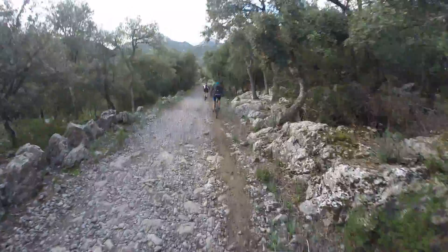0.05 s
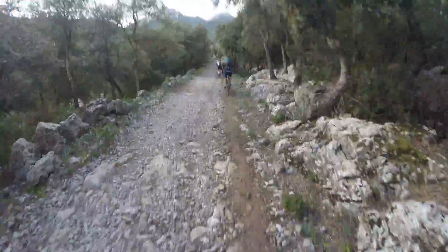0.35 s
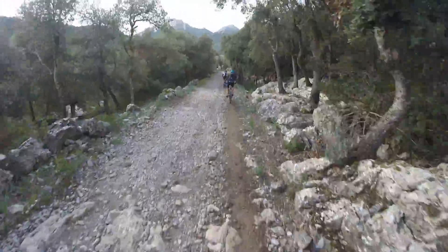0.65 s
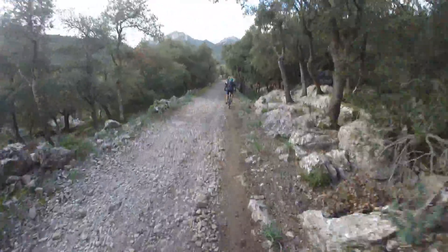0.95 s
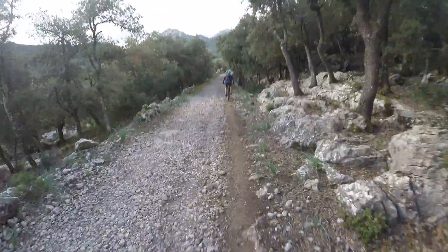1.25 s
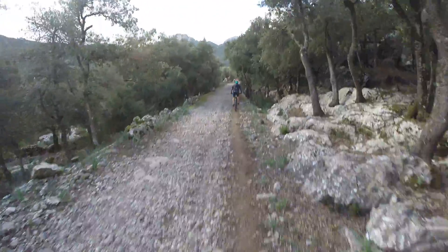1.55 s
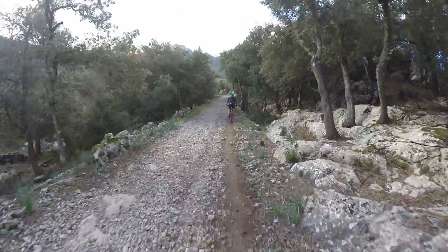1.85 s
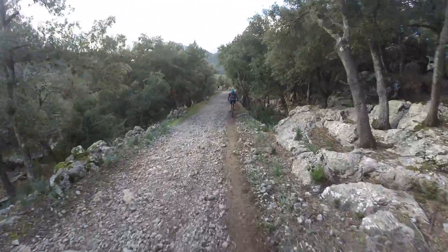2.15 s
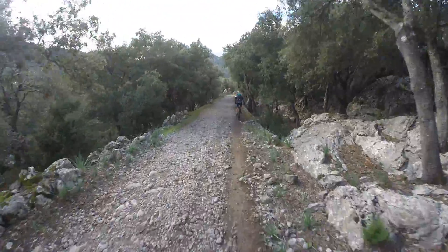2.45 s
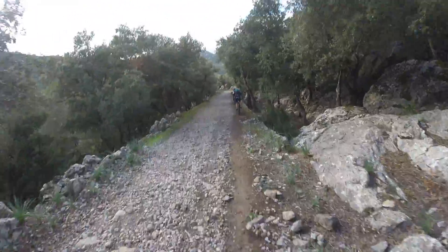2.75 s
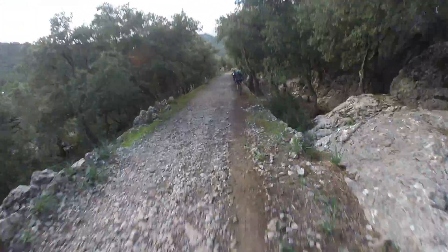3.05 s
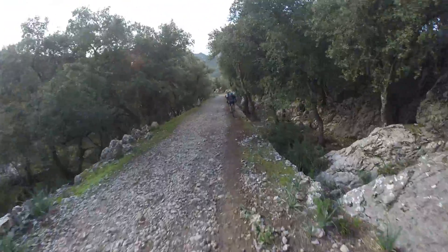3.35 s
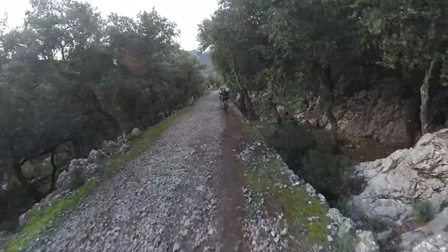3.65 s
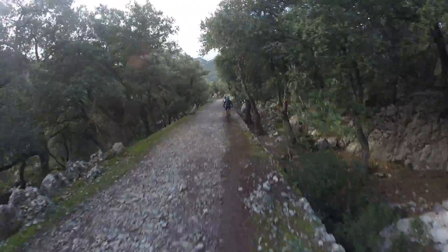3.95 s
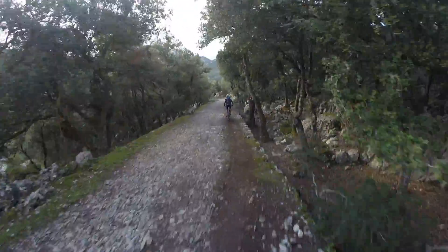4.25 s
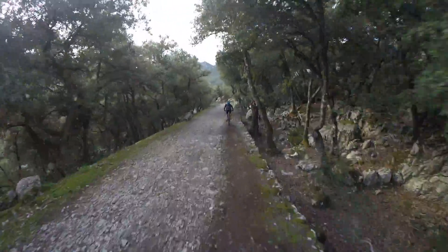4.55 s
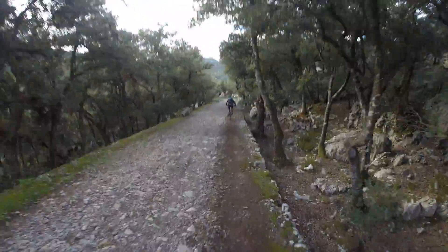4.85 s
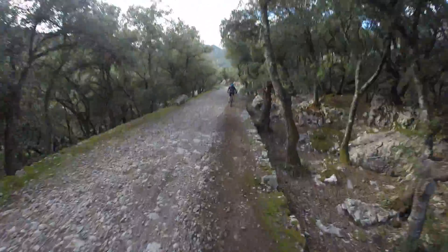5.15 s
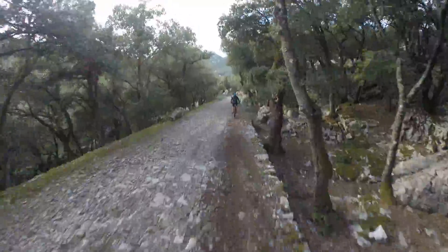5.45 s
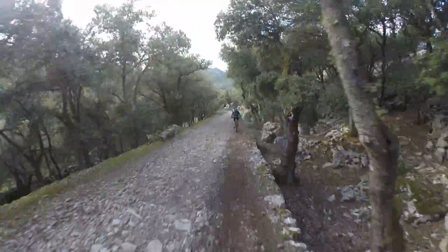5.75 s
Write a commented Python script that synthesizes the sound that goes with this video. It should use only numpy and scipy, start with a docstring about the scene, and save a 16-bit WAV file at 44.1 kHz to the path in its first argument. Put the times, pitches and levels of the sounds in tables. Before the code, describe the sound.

Wind rumbles while a mountain bike rolls down gravel, with dry clacks, hollow knocks and crunching tyres.

```python
"""A mountain bike rolls down a rocky gravel track, heard from a camera carried by the rider.
From the start wind rumbles, tyres hum, hiss and spray stones, and hollow plastic knocks. A run of rocks
jolts the camera against its mount: a dry clack, a thump and a slow sway each time. Loose metal clanks
and soft bumps ring the frame. After a calmer stretch faint chirps pass at 2.5 and 3.5 s, with three more
jolts between them. Then the pace picks up and the gravel hisses louder, under light taps and knocks."""
import sys
import numpy as np
from scipy import signal
from scipy.fft import rfft, irfft, next_fast_len
from scipy.io import wavfile
from scipy.ndimage import uniform_filter1d, minimum_filter1d, map_coordinates

SR = 44100
rng = np.random.default_rng(int(sys.argv[2]) if len(sys.argv) > 2 else 0)


def transcribe(signal):
    """Save signal, clipped to [-1, 1], as a 16-bit WAV file at the path in sys.argv[1]."""
    frames = np.atleast_2d(signal).T
    limited = np.clip(frames, -1, 1)
    pcm = np.round(limited * 32767).astype(np.int16)
    wavfile.write(sys.argv[1], SR, pcm)


N = 255339

# Hard jolts of the mount, each led by a light tap.
# Each row: time in seconds, strength in dB, the tap's lead in seconds, the tap's strength in dB.
JOLTS = [(0.0882, -5, .052, -21.5), (0.2782, -8, .036, -31.5), (0.4453, -4, .048, -28),
         (0.8456, -5, .030, -27), (1.1104, -8, .040, -27), (1.2229, -4.5, .052, -26.5),
         (2.6637, -21, .033, -33), (2.9484, -8, .035, -26), (3.1944, -2, .056, -27.5)]
# The tone of coarse stones. Each row: frequency in Hz, relative level in dB.
COARSE_TONE = [(800, -15.5), (1200, -11.5), (1600, -1.5), (2000, -7.5), (2600, -4.5), (3500, -12.5),
               (4500, -27)]


def amp(db):
    """Decibels to amplitude."""
    return 10 ** (np.asarray(db) / 20)


def unit(x):
    """x at rms 1."""
    return x / np.sqrt(np.mean(x ** 2) + 1e-20)


def along(points, hz):
    """Read (Hz, value) points on a log frequency axis."""
    freqs, values = np.transpose(points)
    return np.interp(np.log(hz + 1), np.log(freqs + 1), values)


def curve(points):
    """Join (seconds, value) points into one value per sample."""
    return np.interp(np.arange(N) / SR, *np.transpose(points))


def wobble(rate):
    """A smooth random curve, rate knots a second."""
    knots = rng.standard_normal(int(N * rate / SR) + 4)
    return map_coordinates(knots, [np.arange(N) * rate / SR])


def filtered(x, response):
    """x shaped by a gain that depends on frequency."""
    size = next_fast_len(N + SR // 2)
    return irfft(rfft(x, size) * response(np.fft.rfftfreq(size, 1 / SR)), size)[:N]


def coloured(x, spectrum):
    """x with the given spectrum, falling away past its ends, at rms 1."""
    lo, hi = spectrum[0][0], spectrum[-1][0]
    skirts = lambda hz: np.minimum(hz / lo, 1) ** 2 / np.maximum(hz / hi, 1) ** 2
    return unit(filtered(x, lambda hz: amp(along(spectrum, hz)) * skirts(hz)))


def dull(x, cut_hz):
    """A soft path rolls off what lies above its cut-off."""
    return signal.sosfilt(signal.butter(4, cut_hz, fs=SR, output="sos"), x)


def struck(spectrum, size=2048):
    """The causal impulse response of a body with this spectrum, peak 1."""
    cepstrum = irfft(np.log(amp(along(spectrum, np.fft.rfftfreq(size, 1 / SR)))))
    cepstrum[1:size // 2] *= 2
    cepstrum[size // 2:] = 0
    response = irfft(np.exp(rfft(cepstrum)))
    return response / np.abs(response).max()


def fade(t, t60):
    """A decay of 60 dB in t60 seconds."""
    return np.exp(-np.log(1000) * t / t60)


def attack(t, rise_s):
    """A rounded onset from 0 towards 1."""
    return 1 - np.exp(-t / rise_s)


def ring(modes, t):
    """Damped modes, at new strengths for every blow."""
    return sum(amp(db + rng.normal(0, 1)) * fade(t, t60) * np.sin(2 * np.pi * hz * t)
               for hz, db, t60 in modes)


def add(track, s, sound):
    """Mix a sound in at s seconds."""
    start = max(round(s * SR), 0)
    track[start:start + len(sound)] += sound[:max(N - start, 0)]


def crunch(rate, spread_db):
    """Tiny stone contacts of uneven size, rate a second, at rms 1."""
    contacts = (rng.random(N) < rate / SR) * rng.standard_normal(N)
    return unit(contacts * amp(spread_db * rng.standard_normal(N)))


def shake():
    """How hard the bike shakes: it builds up to each jolt and dies away after it."""
    t = np.arange(N) / SR
    rise_s, fall_s = 0.057, 0.037
    return sum(amp(0.28 * db) * np.exp(-np.maximum((s - t) / rise_s, (t - s) / fall_s))
               for s, db, *_ in JOLTS)


def wind():
    """Air buffets the camera in slow, rounded waves, harder whenever the bike shakes."""
    # The head wind. Each row: time in seconds, level in dB.
    head_wind = [(0.0, -19.5), (0.6, -27), (1.45, -21.5), (1.8, -33), (2.25, -31), (2.8, -24), (3.3, -26),
                 (3.75, -30.5), (4.1, -20), (4.55, -22), (5.25, -18), (5.45, -24), (5.79, -28)]
    # Its deep rumble. Each row: frequency in Hz, relative level in dB.
    rumble_tone = [(12, 5.5), (22, 4.5), (32, 0.5), (42, -22.5), (55, -22), (80, -28), (140, -59.5),
                   (300, -70)]
    waves = signal.hilbert(coloured(rng.standard_normal(N), rumble_tone))
    swell = np.sqrt(np.abs(uniform_filter1d(np.abs(waves) ** 2, size=1800)) + 0.63)
    gusts = amp(curve(head_wind) + 3 * wobble(rate=16))
    level = np.hypot(gusts, amp(-11) * shake())
    return level * unit(waves.real / swell)  # evened out, so the gusts shape the level


def tyres():
    """Knobs drum and press small stones together, louder with pace; shaking adds judder and grit."""
    # The pace of the ride, as gravel loudness. Each row: time in seconds, relative level in dB.
    gravel = [(0.0, -63), (1.0, -61), (1.35, -63), (1.9, -58), (2.45, -57), (2.75, -53.5), (3.7, -55.5),
              (4.05, -49.5), (4.5, -51.5), (4.82, -45), (5.08, -49), (5.25, -46.5), (5.55, -51),
              (5.79, -47.5)]
    # Tones of knob hum, gravel hiss and fine grit. Each row: frequency in Hz, relative level in dB.
    hum_tone = [(45, -44.5), (80, -3.5), (120, 0.5), (170, -6.5), (250, -10), (330, -7), (430, -17),
                (540, -18.5), (800, -17.5)]
    hiss_tone = [(300, -14.5), (550, -19.5), (900, -12.5), (1200, -10.5), (1530, -0.5), (2000, -6.5),
                 (2270, 2), (2800, -4.5), (3100, -7.5), (3500, -8), (4000, -19.5), (5200, -35),
                 (6000, -15.5), (8000, -53.5)]
    grit_tone = [(2500, -38), (4000, -5), (4600, -1), (5200, -2.5), (6000, -3), (6600, -4), (7400, -11),
                 (8200, -11.5), (9300, -12.5), (11000, -16.5), (13000, -21), (15500, -23.5)]
    gravel_db, rough = curve(gravel), shake()
    pace_db = gravel_db + 56  # zero at a middling pace
    load = wobble(rate=22)  # bumps vary the weight on the tyres
    hum = amp(-50 + 0.52 * pace_db + 1.83 * load) * coloured(rng.standard_normal(N), hum_tone)
    judder = amp(-31) * rough ** 1.58 * dull(coloured(rng.standard_normal(N), hum_tone), cut_hz=460)
    hiss = amp(gravel_db + 3 + load) * coloured(crunch(rate=5000, spread_db=-0.5), hiss_tone)
    ticks = amp(gravel_db - 16.5) * coloured(crunch(rate=60, spread_db=1), COARSE_TONE)
    crushing = np.hypot(amp(-67 + 0.35 * pace_db), amp(-64.5) * rough) * amp(1.3 * wobble(rate=33))
    grit = crushing * coloured(crunch(rate=6200, spread_db=-1), grit_tone)
    return hum + judder + hiss + ticks + grit


def knocks():
    """A hollow plastic part hits and springs back against its other side about 2 ms later."""
    # The knocks. Each row: start in seconds, level in dB.
    hits = [(0.005, -9.5), (0.094, -15.5), (0.129, -32), (1.229, -10), (1.2512, -14), (4.179, -8.5),
            (4.8541, -9)]
    # The hollow body. Each row: frequency in Hz, relative level in dB.
    hollow_tone = [(60, 17.5), (180, 6), (320, 10), (430, 10), (570, -8), (780, -1), (1500, -1),
                   (1850, -5.5), (2300, 4.5), (2850, -8), (3400, -17), (4500, -22.5), (6000, -24.5),
                   (8000, -46), (13000, -87)]
    contacts = np.zeros(N)
    for s, db in hits:
        add(contacts, s, amp([db]))
        bounce_s = 0.0023 * amp(rng.normal(0, 0.5))
        add(contacts, s + bounce_s, -0.55 * amp([db]))
    return signal.fftconvolve(contacts, struck(hollow_tone))[:N]


def sprays():
    """Loose stones squirt from under a tyre, also just before each jolt: fine fizz, coarse crunch."""
    # The larger sprays. Each row: start in seconds, fine level in dB, coarse level in dB, decay in seconds.
    squirts = [(0.039, -62, -44.5, 0.05), (0.736, -64, -53, 0.038), (0.994, -50, -48, 0.059),
               (1.716, -68, -39.5, 0.034), (1.907, -54, -63, 0.016), (1.997, -52, -70, 0.012),
               (2.806, -53, -47.5, 0.032), (2.864, -65, -50, 0.088), (3.096, -59, -61, 0.019),
               (3.312, -59.5, -48, 0.029), (4.023, -55, -47, 0.016), (4.247, -54, -52, 0.031),
               (5.18, -75, -38.5, 0.026)]
    # The tone of fine stones. Each row: frequency in Hz, relative level in dB.
    fine_tone = [(1000, -5), (2500, -9), (4000, 6.5), (6000, 14.5), (7500, 3), (9500, 2.5), (11500, -12.5),
                 (15000, -31.5)]
    fine, coarse = np.zeros((2, N))
    t = np.arange(SR // 4) / SR
    kicked_up = [(s - lead_s, -68.5, -51.5, 0.03) for s, _, lead_s, _ in JOLTS]
    for s, fine_db, coarse_db, decay_s in list(squirts) + kicked_up:
        burst = attack(t, 0.00068) * np.exp(-(t / decay_s) ** 2)
        add(fine, s, amp(fine_db) * burst)
        add(coarse, s, amp(coarse_db) * burst)
    fizz = coloured(crunch(rate=3000, spread_db=4), fine_tone)
    grind = coloured(crunch(rate=1200, spread_db=3), COARSE_TONE)
    return fine * fizz + coarse * grind


def jolts():
    """The camera hits the end of its play: the housing clacks, the mount thumps and sways on."""
    # Light taps of the mount on their own. Each row: start in seconds, strength in dB.
    taps = [(0.327, -35), (0.9867, -31), (1.362, -36.5), (1.502, -31.5), (1.72, -32.5), (1.731, -29),
            (4.7474, -32), (4.785, -29.5), (4.957, -29), (5.114, -28.5), (5.432, -28.5)]
    # The housing's dry clack. Each row: frequency in Hz, relative level in dB.
    clack_tone = [(200, -47), (540, -22.5), (700, -1), (950, 0.5), (1200, -6.5), (1600, 4.5), (2050, 1),
                  (2750, 3.5), (3250, -20), (3600, -10.5), (4200, -26.5), (6200, -30), (8000, -49.5),
                  (13000, -57)]
    # Housing and mount modes. Each row: pitch in Hz, relative level in dB, seconds to fall 60 dB.
    housing_modes = [(1566, -30, 0.047), (1860, -36.5, 0.11)]
    mount_modes = [(83.5, -23, 0.051), (210.7, -10.5, 0.046), (275, -19, 0.073), (327, -24, 0.068)]
    hard_thump_db, lead_thump_db, lone_thump_db = -1.5, 6, -13  # added to the blow's strength
    blows = [(s, db, hard_thump_db) for s, db, *_ in JOLTS]
    blows += [(s - lead_s, db, lead_thump_db) for s, _, lead_s, db in JOLTS]
    blows += [(s, db, lone_thump_db) for s, db in taps]
    clacks, thumps = np.zeros((2, N))
    t = np.arange(SR // 4) / SR
    housing = struck(clack_tone)
    sway = 0.98 * np.cos(2 * np.pi * 32 * t) * fade(t, 0.36)
    for s, db, thump_db in blows:
        contact = 0.065 * attack(t, 0.001) * fade(t, 0.017) * rng.standard_normal(len(t))  # chatter
        contact[0] = 1  # the sharp first hit
        rebound_s = 0.00066 * amp(rng.normal(0, 0.5))
        add(contact, rebound_s, np.array([0.5]))
        clack = signal.fftconvolve(contact, housing)[:len(t)] + ring(housing_modes, t)
        add(clacks, s, amp(db + 1.5) * clack)
        # the mount stiffens above -8 dB: harder pushes are shorter and sound higher
        push_s = np.interp(db, [-8, 0], [0.00623, 0.0025])
        push = 1.08 * np.sin(np.pi * np.minimum(t / push_s, 1))
        add(thumps, s, amp(db + thump_db) * (push + ring(mount_modes, t) + sway))
    return clacks + dull(thumps, cut_hz=374)


def swings():
    """The camera swings out and back through its play just before each hard jolt."""
    swing_s = 0.0445
    track, progress = np.zeros(N), np.linspace(0, 1, int(swing_s * SR))
    swing = -np.sin(2 * np.pi * progress) * np.sin(np.pi * progress)
    for s, db, *_ in JOLTS:
        add(track, s - swing_s, amp(db - 5) * swing)
    return track


def clanks():
    """Loose metal, probably the chain, taps the bike and rings for a moment."""
    # The clanks. Each row: start in seconds, strength in dB.
    hits = [(0.683, -42.5), (0.755, -45.5), (2.405, -42), (2.7983, -23.5), (4.051, -35), (4.309, -44),
            (4.387, -38.5)]
    # The metal's modes. Each row: pitch in Hz, relative level in dB, seconds to fall 60 dB.
    metal_modes = [(1490, 5, 0.023), (1590, -13, 0.021), (2370, -8.5, 0.045), (2650, -1, 0.021)]
    track, t = np.zeros(N), np.arange(SR // 8) / SR
    for s, db in hits:
        add(track, s, amp(db) * attack(t, 0.00027) * ring(metal_modes, t))
    return track


def bumps():
    """Rounded stones reach the frame through the soft tyre and leave a short low ring."""
    # The soft bumps. Each row: start in seconds, strength in dB.
    hits = [(1.255, -21.5), (2.45, -33), (2.506, -37.5), (2.75, -36.5), (3.149, -32), (3.332, -33),
            (4.22, -33), (4.745, -40), (4.791, -34), (4.883, -33.5)]
    # The frame's modes. Each row: pitch in Hz, relative level in dB, seconds to fall 60 dB.
    frame_modes = [(262, 2.5, 0.029), (317, 7, 0.045), (370, -18, 0.017)]
    track, t = np.zeros(N), np.arange(SR // 6) / SR
    for s, db in hits:
        add(track, s, amp(db) * attack(t, 0.0027) * ring(frame_modes, t))
    return track


def chirps():
    """Thin, hoarse rising chirps that level off, perhaps a small bird."""
    # The calls. Each row: start and length in seconds, first and last pitch in Hz, level in dB.
    calls = [(2.533, 0.059, 4900, 5900, -55), (2.537, 0.088, 6900, 7200, -65), (3.48, .06, 5360, 5700, -60)]
    track = np.zeros(N)
    for s, length_s, start_hz, end_hz, db in calls:
        progress = np.linspace(0, 1, int(length_s * SR))
        glide_hz = start_hz + (end_hz - start_hz) * np.sin(np.pi * progress / 2)
        rasp = 1 + 0.035 * wobble(rate=1200)[:len(progress)]
        envelope = np.abs(np.sin(np.pi * progress)) ** 0.5
        add(track, s, amp(db) * envelope * np.sin(2 * np.pi * np.cumsum(glide_hz * rasp) / SR))
    return track


def scene():
    """The whole ride, mixed in mono."""
    ride = wind() + tyres() + knocks() + sprays() + jolts() + swings() + clanks() + bumps()
    return (ride + chirps())[None]


def record(dry):
    """The camera ducks the highest peaks and keeps nothing above its band limit."""
    ceiling, top_hz = 0.94, 15200
    needed_gain = np.minimum(1, ceiling / (np.abs(dry[0]) + 1e-9))
    gain = uniform_filter1d(minimum_filter1d(needed_gain, size=400), size=300)
    return filtered(dry[0] * gain, lambda hz: hz < top_hz)[None]


dry = scene()
out = record(dry)
transcribe(out)
```